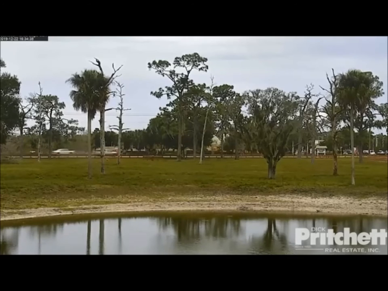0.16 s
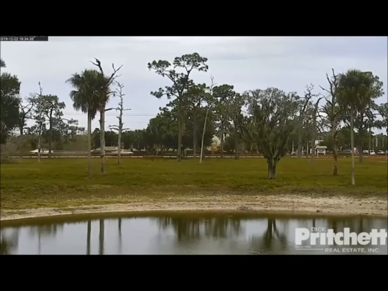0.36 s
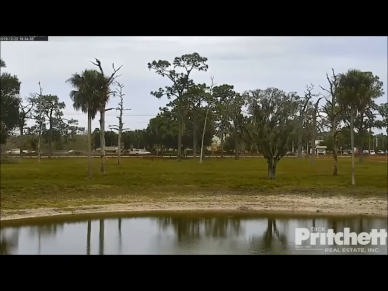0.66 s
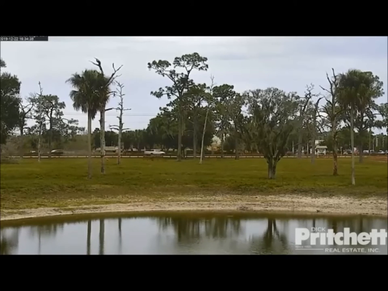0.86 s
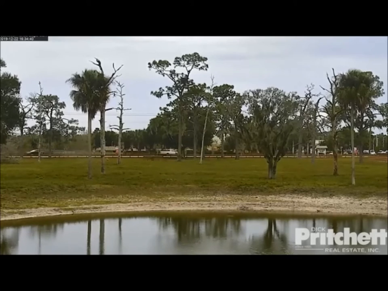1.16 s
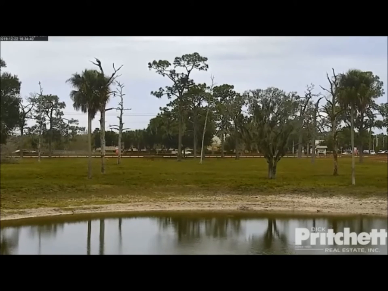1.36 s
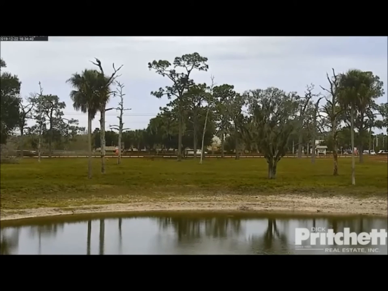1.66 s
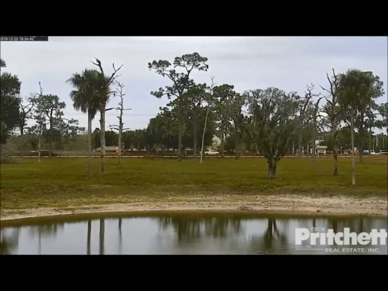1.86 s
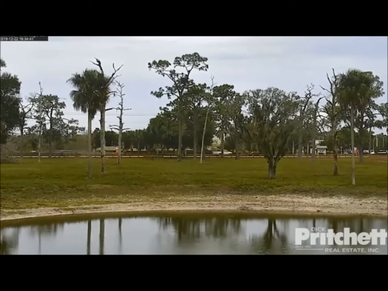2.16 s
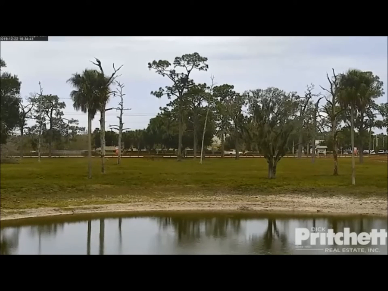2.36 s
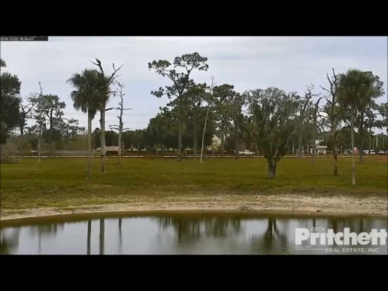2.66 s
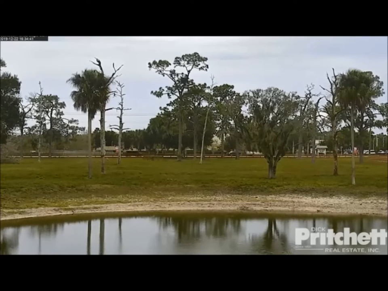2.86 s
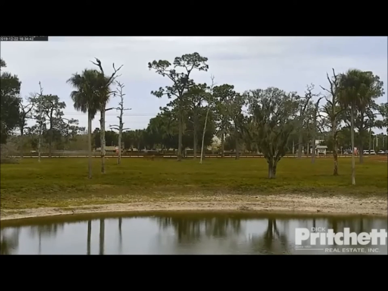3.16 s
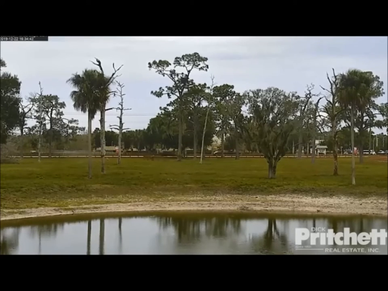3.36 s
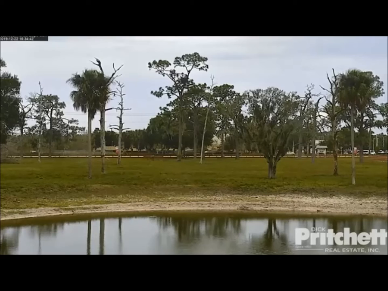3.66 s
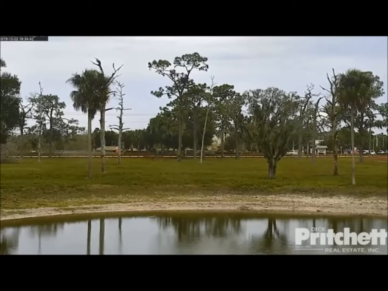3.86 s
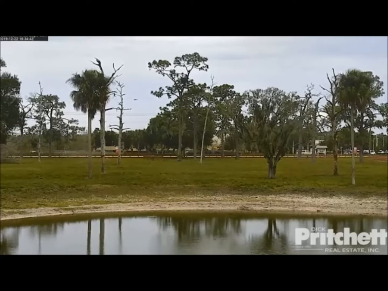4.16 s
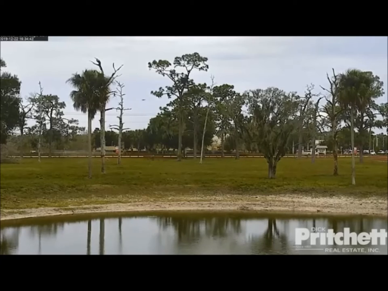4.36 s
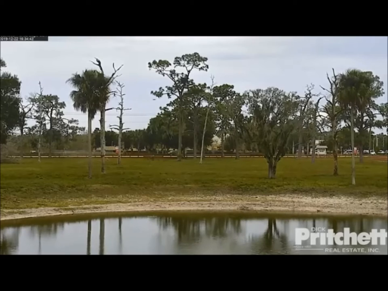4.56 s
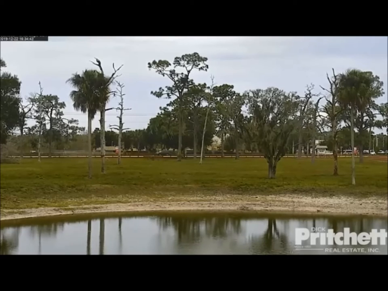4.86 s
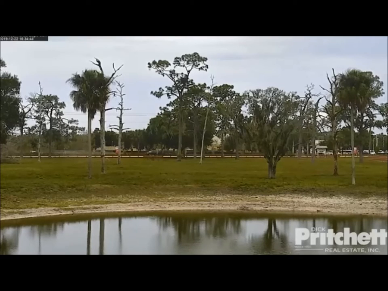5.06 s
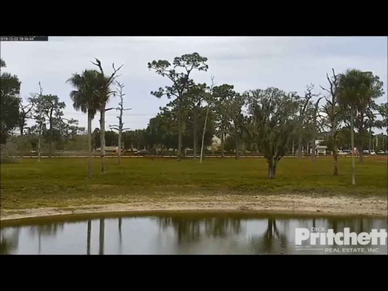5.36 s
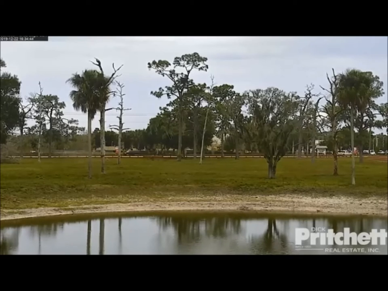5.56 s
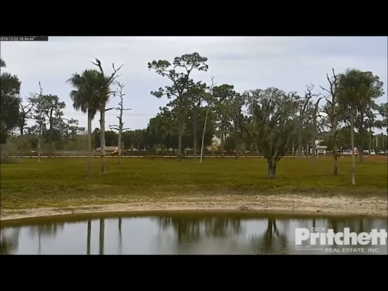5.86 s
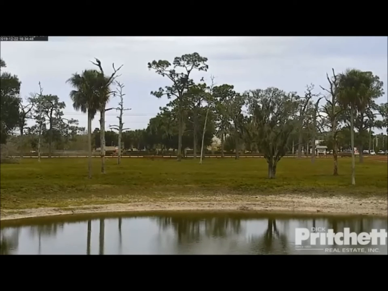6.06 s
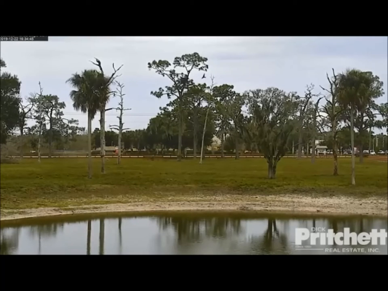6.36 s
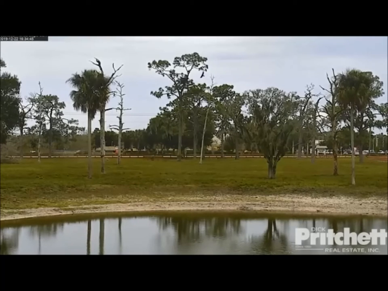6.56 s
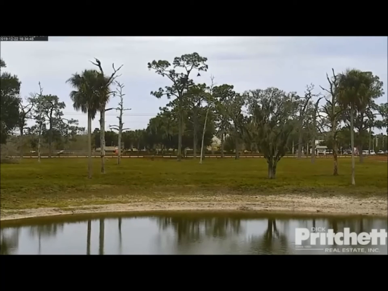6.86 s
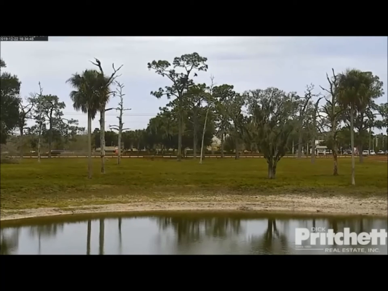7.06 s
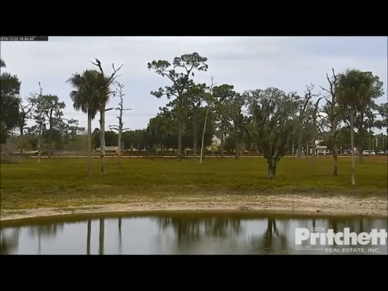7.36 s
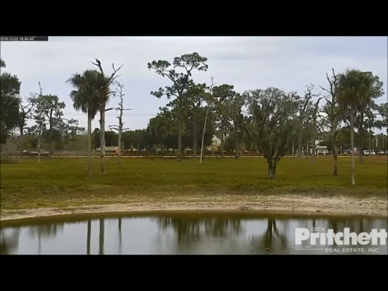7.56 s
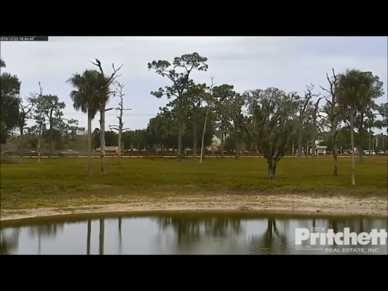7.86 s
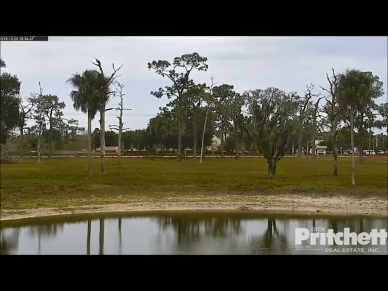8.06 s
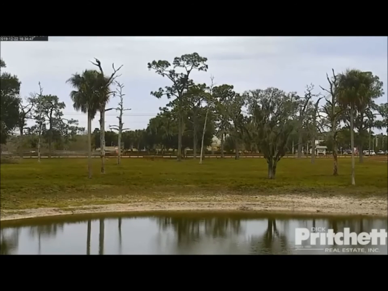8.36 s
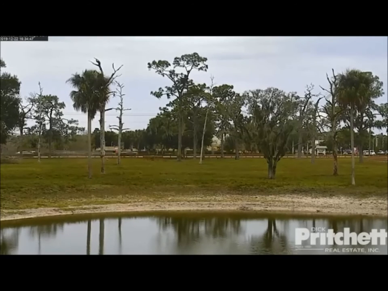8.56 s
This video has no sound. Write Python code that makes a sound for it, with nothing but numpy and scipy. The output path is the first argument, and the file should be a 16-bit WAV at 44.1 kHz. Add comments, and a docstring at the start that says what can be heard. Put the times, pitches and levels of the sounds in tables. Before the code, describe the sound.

Eagles give rapid high whistles, yelps and throbbing screams over one another outdoors, while wind rumbles and thuds against the microphone.

```python
"""Eagles whistle, yelp and scream over each other from the start, and hoarse chatter joins in later.
Their notes are sine tones with a few overtones and noisy rasp, and trees scatter them into an echo.
Wind buffets the microphone as filtered noise and short low thuds, over an uneven background hiss.
The stream drops out now and then and skips a few samples."""
import sys
import numpy as np
from scipy import signal
from scipy.io import wavfile
from scipy.ndimage import uniform_filter1d, minimum_filter1d

SR = 44100
rng = np.random.default_rng(int(sys.argv[2]) if len(sys.argv) > 2 else 0)


def int16_out(signal):
    """Quantize to a 16-bit WAV file."""
    q = np.round(np.clip(np.atleast_2d(signal).T, -1, 1) * 32767)
    wavfile.write(sys.argv[1], SR, q.astype(np.int16))


N = 384976
TOP_HZ = 7400  # upper limit of the overtones and of the stream


def undb(db):
    """Turn decibels into a plain gain."""
    return 10 ** (np.asarray(db) / 20)


def unit(x):
    """Scale a signal to an rms of 1."""
    return x / np.sqrt(np.mean(x ** 2))


def band(x, lo_hz, hi_hz, order=2):
    """Keep only the range between two frequencies (Butterworth band-pass)."""
    return signal.sosfilt(signal.butter(order, [lo_hz, hi_hz], "band", fs=SR, output="sos"), x)


def wobble(hz, order=2):
    """Smooth random motion with rms 1: noise with everything faster than about hz filtered away."""
    lowpass = signal.butter(order, hz, fs=SR, output="sos")
    return unit(signal.sosfilt(lowpass, rng.standard_normal(N)))


def along(table):
    """Sample numbers, soft ends and columns of a table whose rows begin with a time in seconds."""
    s, *columns = np.transpose(table)
    i = np.arange(int(s[0] * SR), min(int(s[-1] * SR), N))
    t = i / SR
    ends = np.clip(np.minimum(t - s[0], s[-1] - t) / 0.0019, 0, 1)  # 1.9 ms fades
    return i, ends, [np.interp(t, s, c) for c in columns]


def throat(hz):
    """Windpipe and beak: overtones fade above their passband and vanish from TOP_HZ up."""
    # Overtone gain of the throat: overtone_hz [Hz], gain_db [dB]
    throat_gain = [(4950, 0), (5600, -24), (7400, -30)]
    return undb(np.interp(hz, *np.transpose(throat_gain))) * (hz < TOP_HZ)


def bent(share, start_hz, turn_hz, end_hz):
    """Pitch along a note, share -1..1: a rounded arch if it turns back, else two straight slides."""
    arch = (turn_hz - start_hz) * (turn_hz - end_hz) > 0
    away_hz = np.where(share < 0, start_hz - turn_hz, end_hz - turn_hz)
    return turn_hz + away_hz * np.abs(share) ** (1 + 1.1 * arch)


def notes():
    """Every eagle note as a curve of (s, Hz, dB), then its overtone and rasp levels in dB."""
    # Long wandering calls, one table each, the long cry first:
    # time_s [s], pitch_hz [Hz], first_partial_db [dB rms]
    whistles = [
        [(1.079, 2017, -36.5), (1.11, 1905, -42), (1.2, 2010, -42.5), (1.3, 2013, -43.5), (1.44, 2050, -43),
         (1.518, 1990, -48.5)],
        [(0, 3734, -2), (.025, 3460, -45.5), (.052, 4084, -15.5), (.135, 3910, -16), (.165, 4925, -21),
         (.198, 4920, -10), (.217, 3520, -21)],
        [(1.41, 3580, -32), (1.46, 3330, -29), (1.535, 3580, -20.5), (1.572, 3210, -20), (1.687, 3555, -18),
         (1.752, 3497, -15), (1.8, 4050, -38), (1.842, 3630, -21), (1.897, 3360, -25.5)],
        [(2.267, 3350, -19), (2.287, 3180, -33.5), (2.303, 3346, -14.5), (2.34, 3390, -35), (2.4, 3326, -25),
         (2.44, 3490, -28), (2.52, 3730, -27), (2.615, 3970, -28.5)],
        [(2.44, 3840, -44.5), (2.5, 4080, -42.5), (2.6, 4110, -28), (2.68, 3970, -39), (2.74, 4000, -33),
         (2.86, 3960, -38)],
        [(2.41, 4000, -46), (2.52, 4450, -42), (2.6, 4800, -38.5), (2.66, 4770, -46.5), (2.87, 4800, -44)],
        [(4.25, 3020, -58), (4.308, 3217, -27.5), (4.34, 3230, -61.5), (4.391, 3246, -15.5),
         (4.537, 3370, -7.5), (4.597, 3414, -13.5), (4.616, 3435, -6.5), (4.654, 3420, -17.5),
         (4.898, 3518, -21), (5.04, 3350, -30)],
        [(5.451, 3140, -28.5), (5.473, 3260, -46.5), (5.53, 3320, -45), (5.562, 3290, -16), (5.603, 3333, -9),
         (5.693, 3488, -11), (5.834, 3614, -22.5)],
        [(6.619, 1810, -24.5), (6.645, 2510, -15), (6.675, 2583, -12.5), (6.714, 2350, -22.5),
         (6.76, 2795, -35)],
        [(6.751, 3376, -20.5), (6.818, 3520, -16), (6.884, 3615, -9), (6.928, 3650, -14.5), (7.016, 3663, -18)],
        [(6.915, 2340, -11), (6.95, 2508, -15.5), (7, 2512, -17.5), (7.126, 2680, -14), (7.145, 2790, -10.5)],
        [(7.629, 3520, -38.5), (7.645, 3400, -28), (7.72, 3095, -40), (7.83, 3290, -14.5), (7.89, 3490, -28.5),
         (7.93, 3503, -16), (8.05, 3560, -10), (8.095, 3620, -25)],
    ]
    # Voice of each whistle: overtones_db [dB], rasp_db [dB]
    whistle_voice = [(27, -23.5), (-41, -20.5), (-10.5, -26.5), (-31.5, -31), (-40, 7.5), (-26, -22.5),
                     (-8.5, -44.5), (-10.5, -43.5), (-3, -13), (-17, -34), (-11.5, -28.5), (-18, -46.5)]
    # Harsh throbbing screams, one table each: time_s [s], pitch_hz [Hz], first_partial_db [dB rms]
    screams = [
        [(2.615, 2930, -20.5), (2.625, 2757, -10), (2.641, 2760, -12.5), (2.655, 2940, -9.5),
         (2.685, 2887, -17.5), (2.703, 2800, -12.5), (2.745, 2780, -11), (2.779, 2950, -14), (2.8, 2800, -34)],
        [(3.158, 2990, -32), (3.168, 2854, -5), (3.196, 2960, -15.5), (3.224, 3050, -19), (3.242, 2850, -12.5),
         (3.275, 2806, -14), (3.31, 2850, -12), (3.32, 2937, -11.5), (3.355, 2870, -21)],
        [(7.705, 2820, -17.5), (7.715, 2750, -8), (7.74, 2893, -12), (7.769, 2945, -14.5), (7.777, 2970, -13.5),
         (7.789, 2766, -25.5), (7.82, 2820, -9), (7.871, 2930, -11.5), (7.91, 2790, -24.5)],
    ]
    # Voice of each scream: overtones_db [dB], rasp_db [dB]
    scream_voice = [(-6, -19), (-3, -19), (-6, -19)]
    # Notes, short or long, that bend once while their level runs straight from start to end:
    # start_s [s], before_bend_ms [ms], after_bend_ms [ms],
    # start_hz [Hz], bend_hz [Hz], end_hz [Hz], start_db [dB rms], end_db [dB rms],
    # overtones_db [dB], rasp_db [dB]
    bending_notes = [(0.356, 39, 51, 3750, 4120, 2520, -19.5, -20.5, -34, -11.5),
                     (.309, 10.6, 13, 3890, 3570, 3550, -15.5, -18.5, -25.5, -14.5),
                     (.316, 13, 11, 2640, 2670, 2620, -10, -24, -27, -17),
                     (.326, 7.6, 28, 3560, 3820, 3600, -25.5, -22.5, -24, -13),
                     (.342, 10.6, 33, 2900, 2720, 3200, -37, -24, -23, -10.5),
                     (.489, 20.5, 18, 3640, 3480, 3510, -17, -21, -24, -10),
                     (0.528, 9.4, 24, 5000, 4700, 4260, -30.5, -34.5, -26, -14),
                     (0.491, 34, 29, 2960, 3062, 3050, -3, -30, -0.5, -13.5),
                     (0.552, 52, 33, 3500, 4256, 3580, -21, -20.5, -31, -37),
                     (0.63, 60, 76, 3706, 4160, 3900, -18.5, -20, -26, -29),
                     (.772, 62, 30, 4970, 5020, 4800, -25, -28.5, -26, -26.5),
                     (0.835, 20, 13, 4280, 4075, 4450, -11.5, -23, -26, -1),
                     (0.81, 13.7, 13, 1380, 1375, 1504, -31, -35.5, 9.5, 10.5),
                     (0.869, 35.3, 62, 4250, 4080, 4380, -31, -12.5, -26, -26.5),
                     (0.964, 46, 22, 4990, 4990, 4770, -25.5, -23.5, -26, -27.5),
                     (1.03, 16, 9.2, 4780, 5060, 4340, -21, -31, -26, -27.5),
                     (1.11, 41, 22, 4150, 4530, 4220, -17, -19.5, -26, -46),
                     (1.808, 19.3, 19.5, 1406, 1573, 1576, -32.5, -18, -6, 6),
                     (1.844, 184, 29.6, 2137, 2145, 1863, -24.5, -26.5, 11.5, -26),
                     (3.149, 8.6, 12.8, 3230, 4080, 3240, -28.5, -5.5, -10, -16),
                     (3.339, 92, 64, 2433, 2446, 2570, -26.5, -27, -3, -46.5),
                     (3.49, 60, 144, 3257, 3493, 3550, -15.5, -13.5, -18, -32.5),
                     (3.834, 15, 10.5, 3970, 4740, 3260, -34, -32, -17, -24.5),
                     (4.579, 32, 17, 2084, 2330, 2210, -21, -24, -7, -9),
                     (4.612, 18, 25, 2305, 2307, 2570, -15, -10.5, -17, -16),
                     (4.691, 8.5, 16, 2790, 2490, 2500, -32, -31.5, -18.5, -18.5),
                     (4.768, 5.5, 9.5, 4180, 4000, 3820, -24, -21.5, -26, 0),
                     (4.648, 36, 7.5, 3000, 2976, 3140, -6.5, -21, -2, -19),
                     (4.699, 15, 53, 3070, 2840, 3170, -18.5, -10.5, 8, -22),
                     (4.802, 16.8, 9.7, 2800, 2163, 2130, -25.5, -22.5, 1, -8.5),
                     (5.835, 181, 172, 4265, 4309, 4263, -11.5, -11.5, -26, -36),
                     (6.474, 44.3, 49.6, 3680, 3904, 3050, -21, -20.5, -15.5, -13.5),
                     (7.025, 151.6, 23.7, 4320, 4420, 4270, -19, -16, -26, -53.5),
                     (8.086, 52.5, 63, 4243, 4210, 4162, -13, -15.5, -26, -72),
                     (8.319, 11, 15, 3680, 3390, 4640, -21, -24.5, -47, -30),
                     (8.331, 10.4, 34, 4480, 4530, 3150, -30, -19, -49, -18),
                     (8.38, 5.8, 5.3, 2380, 2780, 2650, -13, -31.5, -48, -1)]
    # Short yelps that slide in pitch and die away: peak_s [s], rise_ms [ms], fall_ms [ms],
    # start_hz [Hz], peak_hz [Hz], end_hz [Hz], first_partial_db [dB rms at the peak],
    # overtones_db [dB], rasp_db [dB]
    yelps = [(0.297, 26.5, 35, 1890, 2446, 2554, -19.5, 6.5, -12),
             (0.318, 8.8, 5, 2940, 3140, 2970, -0.5, -19, -21.5),
             (0.467, 19.7, 26, 2500, 2275, 2650, -5.5, 2.5, -18),
             (.5, 9.5, 45, 2440, 2590, 2180, -13.5, -14.5, -11),
             (0.619, 46, 39, 1914, 2395, 2120, -15.5, 5, -23.5),
             (0.723, 36, 42, 1759, 2300, 2106, -20, 8, -19.5),
             (0.863, 13.3, 3, 1860, 2970, 2220, -12, 5, 2.5),
             (0.875, 9, 34, 2480, 2126, 1776, -30, 20, -17),
             (0.958, 10.4, 22, 4010, 4560, 4560, -25.5, -26, -37.5),
             (1.061, 12, 19, 1391, 1387, 1910, -24.5, 11, 3.5),
             (1.527, 23, 23, 1477, 1470, 1220, -32, 8.5, -9),
             (2.614, 10, 9, 3300, 3520, 3400, -20, -34, 2.5),
             (3.152, 5.9, 4.1, 2840, 3000, 3050, -5, -14, -6.5),
             (3.322, 6.6, 5.3, 3690, 3680, 3770, -26, -27, -6.5),
             (3.72, 10, 8.4, 4070, 2740, 2870, -10, -9, -32),
             (3.733, 7.4, 13, 2980, 2990, 2870, -14.5, 0, -3),
             (3.779, 1.6, 3.2, 3200, 3020, 2930, -17, -37, -13.5),
             (3.792, 1.6, 1.7, 3200, 2810, 2540, -13.5, -23.5, -8),
             (3.805, 4.3, 17, 4070, 3500, 3520, -25, -24.5, -5.5),
             (3.874, 4.2, 4.3, 3140, 2850, 2750, -22, -27.5, -14.5),
             (3.798, 32, 16, 3940, 4055, 3930, -24.5, -24.5, -32),
             (3.868, 8.5, 6.3, 3440, 3830, 3460, -21.5, -34, -24.5),
             (4.224, 6.1, 4.6, 2630, 2720, 2640, -33.5, -36, -11),
             (4.579, 4.4, 10, 2870, 2805, 2925, -15.5, -17.5, -10.5),
             (4.68, 7, 12.7, 3764, 3457, 3950, -14, -28, -21.5),
             (4.791, 10.6, 12, 3530, 3090, 2910, -14, -25.5, -21.5),
             (4.873, 12, 20, 2700, 3154, 3050, -13.5, 6, 4),
             (4.901, 9.2, 6.9, 3120, 2400, 2530, -16, -21.5, -12),
             (4.93, 15, 31, 2040, 2117, 2020, -35, 5, -22.5),
             (4.975, 11.3, 6.8, 2920, 2740, 3010, -13, 12, -24.5),
             (4.982, 12.3, 13, 2436, 2410, 2100, -14, -1, -22),
             (4.999, 7, 18, 2140, 2220, 1860, -31, 21, -4),
             (5.034, 10, 6.6, 3700, 3730, 3570, -28, -29, -17.5),
             (5.1, 13.6, 9.7, 3810, 2680, 2430, -15, -21.5, 8),
             (5.119, 19.3, 20, 1930, 2093, 1980, -33.5, 17.5, 4.5),
             (5.227, 6.8, 5.9, 3280, 2980, 2520, -16.5, -13, 0),
             (5.234, 6.5, 12.3, 2350, 2173, 1866, -26, 17, -9),
             (5.421, 31, 16.3, 2236, 1888, 1960, -32, 15.5, 9),
             (5.584, 22, 7.5, 1470, 1396, 1220, -28.5, 1, -40),
             (5.727, 6.1, 12, 1320, 1375, 1300, -27, 8.5, -38.5),
             (5.868, 32.4, 11.5, 1325, 1290, 1216, -28.5, 7.5, -33.5),
             (6.039, 27.8, 22.6, 1322, 1465, 1315, -16.5, -4.5, -23),
             (6.429, 16, 7.4, 1348, 1573, 1620, -13.5, -14.5, 4),
             (6.448, 23, 11.2, 2920, 2717, 2604, -4, 1.5, -9),
             (6.575, 11, 16, 2500, 2440, 2320, -15, -19.5, -23),
             (6.909, 9.3, 24, 1414, 1470, 1536, -22, -8, -2.5),
             (7.147, 5.6, 36, 3374, 3388, 2700, -20, 2, -4.5),
             (7.183, 39, 13, 2680, 2385, 2360, -16, -10.5, -29),
             (8.219, 9.3, 6.4, 4460, 2752, 2750, -11, -15.5, -8),
             (8.236, 18, 16, 2740, 2800, 2710, -14, -6, 7.5),
             (8.259, 1.3, 2, 2900, 3200, 3500, -18, -27, -7),
             (8.277, 4.3, 7.3, 4000, 3730, 2750, -31, -29.5, -2),
             (8.289, 1.6, 1.7, 3700, 3300, 2820, -28, -29, 1),
             (7.798, 8, 7.3, 3530, 3650, 3630, -17.5, -35.5, -14),
             (7.878, 8, 10, 3390, 3650, 3190, -20.5, -28, 3.5),
             (8.301, 3.4, 3.3, 3830, 3390, 3500, -15.5, -30, -23),
             (8.655, 36, 130, 3600, 3150, 3150, -38.5, 2, -24)]
    # level at the start and end of a yelp against its peak
    yelp_start_db, yelp_end_db, yelp_roundness = -18.5, -22, 3.96

    for table, voice in zip(whistles + screams, whistle_voice + scream_voice):
        yield table, *voice

    share = np.linspace(-1, 1, num=41)  # -1 at the start, 0 at the turn, 1 at the end
    for start, before, after, *hz, first_db, last_db, over_db, rasp_db in bending_notes:
        t = (before + share * np.where(share < 0, before, after)) / 1000
        db = first_db + (last_db - first_db) * t / t[-1]
        yield np.transpose([start + t, bent(share, *hz), db]), over_db, rasp_db

    for peak, rise, fall, *hz, db, over_db, rasp_db in yelps:
        t = peak + share * np.where(share < 0, rise, fall) / 1000
        edge_db = np.where(share < 0, yelp_start_db, yelp_end_db)
        db = db + edge_db * np.abs(share) ** yelp_roundness
        yield np.transpose([t, bent(share, *hz), db]), over_db, rasp_db


def eagles():
    """Near-sine tones of the syrinx (voice organ) with up to three overtones; hoarse notes flutter and rasp."""
    # Extra lines of the long cry, where every other cycle differs:
    # multiple [times the pitch], level_db [dB against the first partial]
    half_lines = [(1.5, -2), (2.5, -8)]
    clear, hoarse = np.zeros(N), np.zeros(N)
    jitter, flutter, puffs = wobble(61), wobble(75, order=4), wobble(90)
    rasp = .22 * wobble(1300, order=4) + .5 * wobble(380, order=4) + 1.3 * wobble(110, order=4)

    for note, (table, over_db, rasp_db) in enumerate(notes()):
        i, ends, (hz, db) = along(table)
        hoarseness = np.clip((rasp_db + 58.0) / 35, 0, 1)
        # the syrinx muscles round off every turn of the pitch
        hz = uniform_filter1d(hz, size=265, mode="nearest")
        shaky_hz = hz * (1 + (.002 + .004 * hoarseness) * jitter[i])
        phase = 2 * np.pi * np.cumsum(shaky_hz) / SR

        # the third partial is strong only in low notes, and hoarseness wears it down
        third = np.clip((2250 - hz) / 600, .03, 1) * (1.3 - hoarseness)
        overtones = throat(2 * hz) * np.sin(2 * phase)
        overtones += 3.7 * third * throat(3 * hz) * np.sin(3 * phase)
        # only the lowest notes have a fourth
        overtones += 0.5 * (hz < 1700) * throat(4 * hz) * np.sin(4 * phase)
        partials = np.sin(phase) + undb(over_db) * overtones
        if note == 0:  # the long cry
            partials += sum(undb(half_db) * np.sin(k * phase) for k, half_db in half_lines)

        tone = np.sqrt(2) * ends * undb(db) * partials
        clear[i] += tone * (1 + (.12 + .6 * hoarseness ** 2) * np.tanh(flutter[i]))
        # the rasp level is capped, then comes in puffs
        hoarse[i] += tone * undb(min(rasp_db, -8) + 3 * puffs[i]) * rasp[i]

    # air rushes through the strained throat and lingers around each hoarse note
    strain = uniform_filter1d(np.abs(hoarse), size=900)
    linger = np.exp(-1 / (.03 * SR))  # fades over 30 ms
    strain = signal.lfilter([1 - linger], [1, -linger], strain)
    rush = undb(-7 + 2.5 * puffs) * strain * rng.standard_normal(N)
    return clear + band(hoarse + rush, 2224, 5000, order=8)


def trees(x):
    """Quick scatter from branches, then a thin long tail from the tree line, both decaying noise."""
    near_t60_s, near_db = 0.072, -12.5  # T60: time to fade by 60 dB
    far_t60_s, far_db = 0.87, -33
    t = np.arange(int(1.2 * SR)) / SR
    near, far = rng.standard_normal((2, len(t))) * (t > .004)  # echoes start after 4 ms
    near = near * 1000. ** (-t / near_t60_s)
    far = far * 1000. ** (-t / far_t60_s)
    tail = undb(near_db) * near / np.linalg.norm(near) + undb(far_db) * far / np.linalg.norm(far)
    return signal.fftconvolve(x, tail)[:N]


def wind(buffet_db):
    """Eddies hit the capsule as low rumble and short thuds; hard ones bend the diaphragm and crackle."""
    # Loudest wind thuds: time_s [s], peak_db [dB], length_ms [ms, width at half height]
    loud_thuds = [(.13, -11, 6.6), (.207, -8.5, 3.1), (1.367, -4, 1.6), (1.382, -9, 8), (1.392, 2, 0.46),
                  (1.4, 7.5, 2.5), (1.412, 6, 2.1), (1.568, -6.5, 1), (1.585, 4, 0.96), (1.593, 0, 10),
                  (1.648, 6, 2.05), (1.986, 2, 4.9), (2.444, -9, 7), (2.458, -12, 12), (2.521, -4.5, 8.2),
                  (2.552, -16, 7), (3.698, -0.5, 3.7), (4.05, -2.5, 2.8), (4.114, -9.5, 11.5),
                  (4.195, -12.5, 7.5), (4.212, -5.5, 3), (5.784, -7.5, 6.8), (6.253, -9, 4.1),
                  (6.322, -2, 2.24), (6.334, -3.5, 6.4), (6.354, 4, 2.34), (6.37, -9.5, 12.3),
                  (6.693, -4.5, 9.9), (7.397, -11, 6.3), (8.133, -8.5, 3.4), (8.16, -5.5, 3.3),
                  (8.171, 7.5, 1.77), (8.203, -8, 3.2), (8.617, -8, 2.9), (8.695, -15, 5.5)]
    thud_hz, sag_hz_per_ms, spread_hz = 316.5, 13.35, 61  # longer thuds are lower
    small_count, small_over_buffet_db, small_ms = 70, 13.5, 7.3  # varied at random below

    rumble = band(rng.standard_normal(N), 140, 262.0)
    rumble = rumble + 0.26 * band(rng.standard_normal(N), 310, 427)
    gusty_db = buffet_db + 6.33 * np.clip(wobble(14.7), -3, 2)
    out = undb(gusty_db) * unit(rumble)

    place, size, length = rng.uniform(0, 1, (small_count, 3)).T
    small_db = buffet_db[(place * N).astype(int)] + small_over_buffet_db + 8 * size
    small_thuds = np.transpose([place * N / SR, small_db, small_ms * (0.3 + length)])
    thuds = np.vstack([loud_thuds, small_thuds])
    around = np.arange(-1500, 1500)  # samples around the middle of a thud
    t = around / SR
    for (s, db, ms), (turn, pitch) in zip(thuds, rng.uniform(-0.78, 1, (len(thuds), 2))):
        hz = thud_hz - sag_hz_per_ms * ms + spread_hz * pitch
        i = np.clip(int(s * SR) + around, 0, N - 1)
        bump = np.exp(-4 * np.log(2) * (1000 * t / ms) ** 2)
        out[i] += undb(db) * bump * np.cos(2 * np.pi * hz * t + np.pi * turn)

    force = uniform_filter1d(np.abs(out), size=200)
    # the steep power leaves crackle only where the wind hits hard
    crackle = force ** 4.47 * unit(band(rng.standard_normal(N), 250, 710, order=2))
    return out + undb(1.5) * crackle


def background_hiss(db):
    """Uneven background hiss: third-octave bands of noise, each flickering on its own."""
    # Spectrum of the background hiss: band_hz [Hz], density_db [relative dB per Hz]
    hiss_spectrum = [(380, -3), (452, -21), (663, 10), (1140, -13.5), (1470, -4), (1850, -28.5),
                     (2560, -16.5), (3440, -15.5), (3620, -14.5), (4250, -13.5), (4640, -29.5), (7330, -39)]
    hz, shape_db = np.transpose(hiss_spectrum)
    out = np.zeros(N)
    for centre in 400 * 2 ** np.arange(0, 4.1, 1 / 3):
        # wider bands hold more power
        size_db = np.interp(np.log(centre), np.log(hz), shape_db) + 10 * np.log10(centre)
        noise = band(rng.standard_normal(N), centre / 2 ** (1 / 6), centre * 2 ** (1 / 6))
        out += undb(size_db + 2.5 * wobble(6)) * unit(noise)
    return undb(db) * unit(out)


def chatter():
    """A voice that breaks up: short pulses of scattered pitch, each sliding slightly up or down."""
    # Hoarse chatter, one table a burst: time_s [s], centre_hz [Hz], pulse_db [dB, middle of the peak levels]
    bursts = [
        [(3.69, 3880, -23), (3.8, 3160, -31), (3.88, 3300, -28.5), (3.92, 3200, -46)],
        [(8.2, 2950, -23), (8.31, 3220, -27.5), (8.38, 3500, -33), (8.42, 3470, -40)],
        [(4.6, 3000, -37.5), (5.04, 3300, -33.5)],
    ]
    out = np.zeros(N)
    around = np.arange(-300, 300)  # samples around the middle of a pulse
    t = around / SR
    for table in bursts:
        i, _, (hz, db) = along(table)
        pulses = rng.uniform(-1, 1, (int(len(i) / SR * 380), 4))  # 380 pulses a second
        for place, pitch, slide, size in pulses:
            k = int((place + 1) / 2 * (len(i) - 1))
            phase = 2 * np.pi * (hz[k] * (1 + .24 * pitch) * t + 60000 * slide * t ** 2)
            bump = np.exp(-(t / .0011) ** 2)
            out[i[k] + around] += undb(db[k] + 7 * size) * bump * np.sin(phase)
    return out


def scene():
    """Birds and their echo from the trees, with wind that rises and falls, over hiss of varying level."""
    # Course of wind and hiss: time_s [s], buffeting_db [dB, before its quick swings],
    # background_hiss_db [dB rms]
    gusts = [(0.0, -45, -41.5), (0.092, -28.5, -37), (0.291, -45.5, -48.5), (1.298, -41.5, -54),
             (1.49, -34, -35), (1.59, -21, -60), (1.81, -40.5, -55), (2.069, -40.5, -45.5),
             (2.409, -24, -47), (2.53, -23, -51), (2.701, -39, -51), (2.939, -38.5, -47),
             (3.09, -25.5, -48), (3.297, -42.5, -48.5), (4.049, -24.5, -49.5), (4.39, -31.5, -44.5),
             (4.7, -39, -53.5), (5.11, -36, -60.5), (5.762, -29.5, -46), (6.049, -44, -46.5),
             (6.439, -39.5, -49), (6.78, -37, -57.5), (7.141, -43, -53.5), (7.55, -42.5, -47),
             (7.979, -48, -50), (8.661, -32, -52.5)]
    s, *columns = np.transpose(gusts)
    buffet_db, hiss_db = (np.interp(np.arange(N) / SR, s, c) for c in columns)
    birds = eagles() + chatter()
    return (birds + trees(birds) + wind(buffet_db) + background_hiss(hiss_db))[None]


def record(dry):
    """Capsule, bass cut and peak limiter, then a stream that nearly falls silent at times and skips."""
    # Stream dropouts: start_s [s], end_s [s], return_ms [ms]
    dropouts = [(1.898, 1.946, .05), (4.086, 4.111, 1.5), (5.165, 5.183, 2), (8.427, 8.444, 2)]
    # Moments where the stream skips: time_s [s]
    skip_times = [.277, 2.0095, 4.1735, 5.246]
    skip_samples = 5
    limit = .76  # peak level, full scale is 1

    # a lopsided capsule mixes overlapping voices and wind into sum and difference tones
    x = dry + undb(-34.5) * dry ** 2
    x = signal.sosfilt(signal.butter(10, 118, "high", fs=SR, output="sos"), x)
    gain = minimum_filter1d(np.minimum(1, limit / (np.abs(x) + 1e-9)), size=441)  # 10 ms window
    x = x * uniform_filter1d(gain, size=441)

    t = np.arange(N) / SR
    for start, end, back_ms in dropouts:
        fade_out = 1000. ** (-np.abs(t - start) / 0.011)  # 60 dB in 11 ms
        fade_in = np.exp(-1000 * np.abs(end - t) / back_ms)
        x = x * np.where((t > start) & (t < end), undb(-44.5) + fade_out + fade_in, 1)

    skipped = skip_samples * np.searchsorted(skip_times, t)
    x = x[:, np.minimum(np.arange(N) + skipped, N - 1)]
    return signal.sosfilt(signal.ellip(10, .2, 90, TOP_HZ, fs=SR, output="sos"), x)


dry = scene()
out = record(dry)
int16_out(out)
```